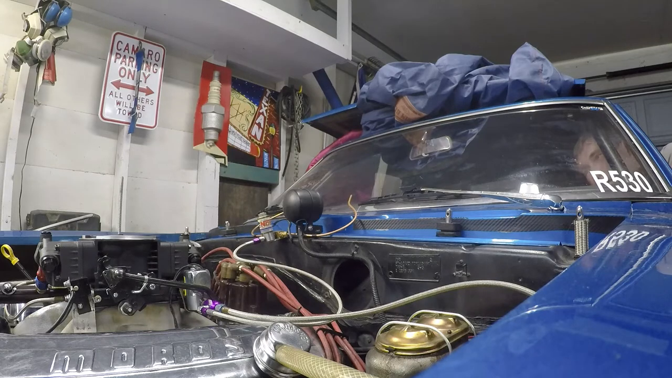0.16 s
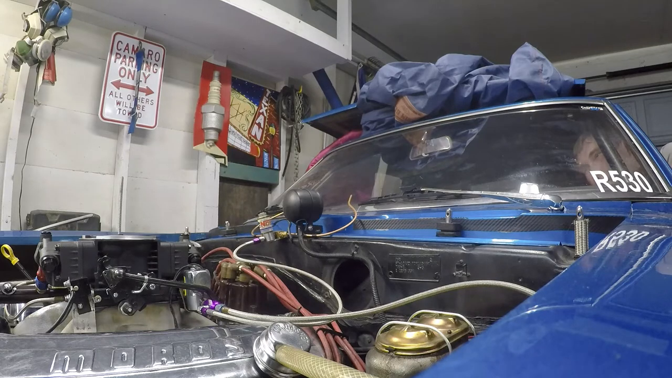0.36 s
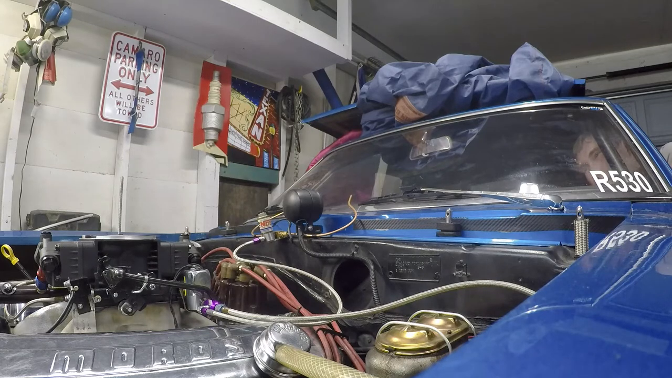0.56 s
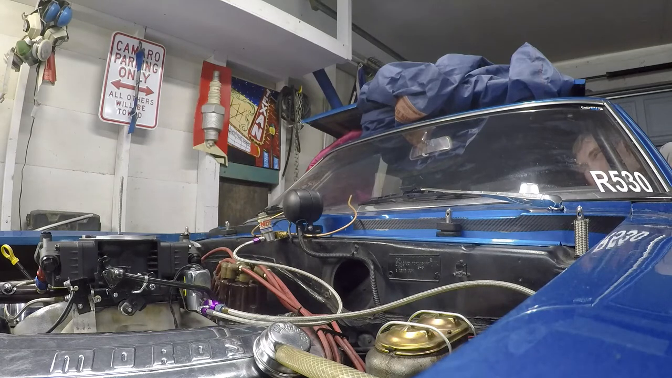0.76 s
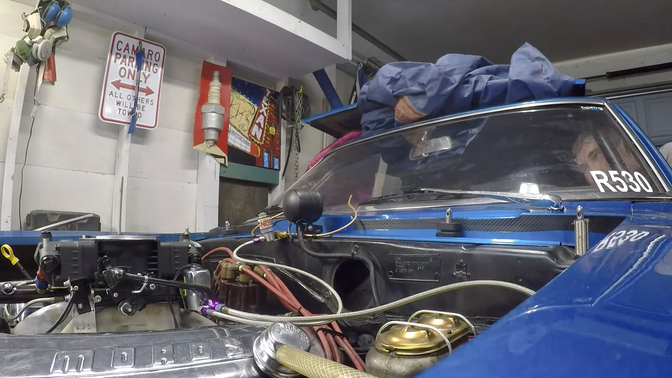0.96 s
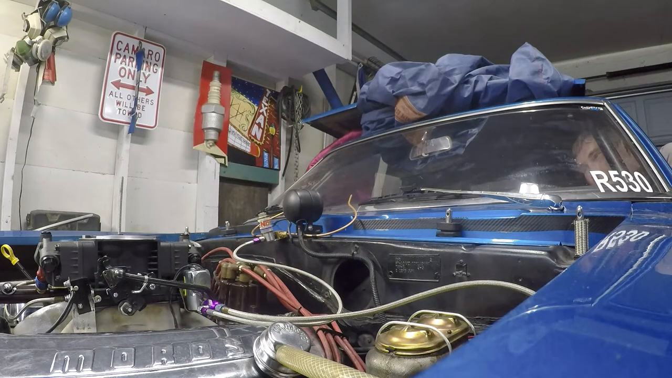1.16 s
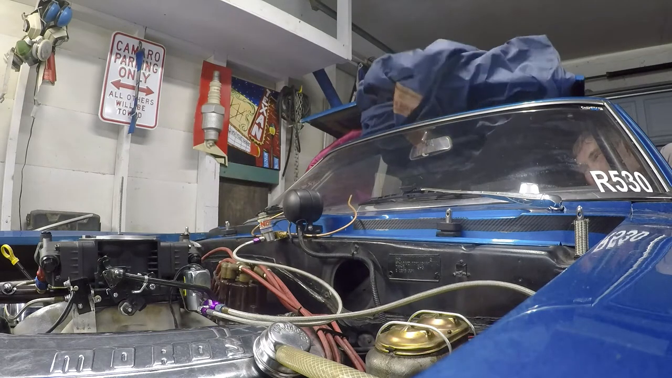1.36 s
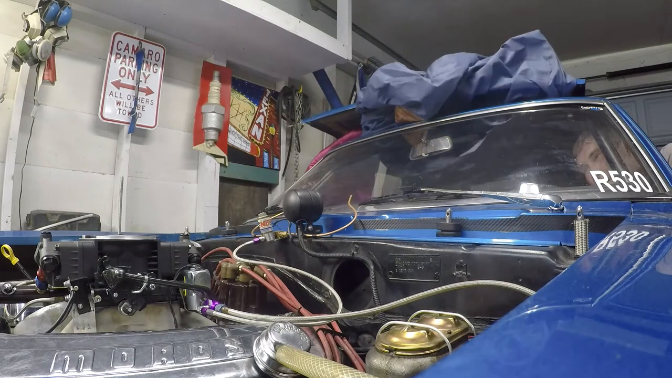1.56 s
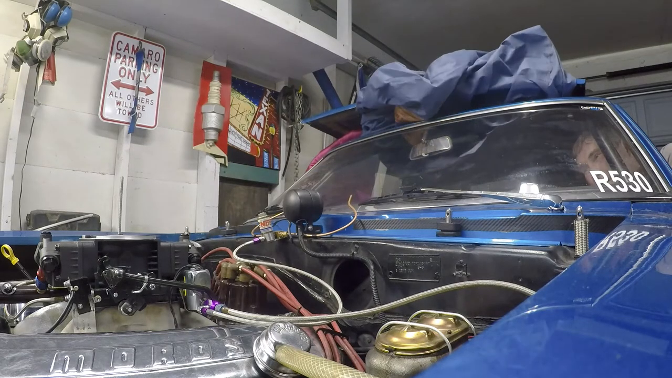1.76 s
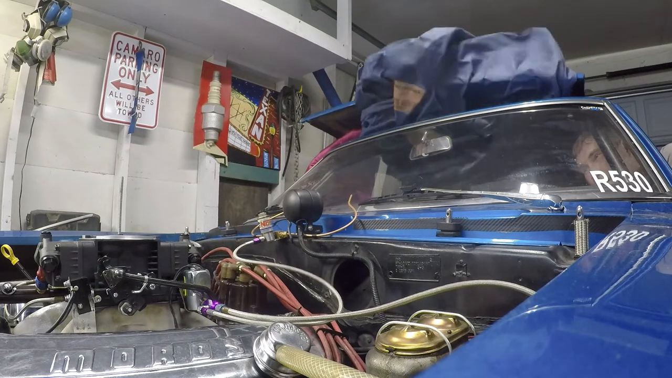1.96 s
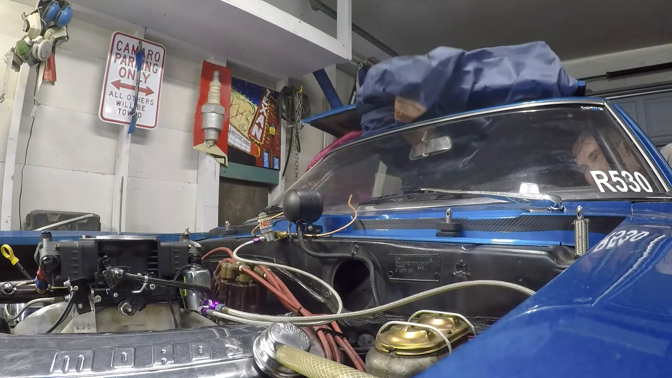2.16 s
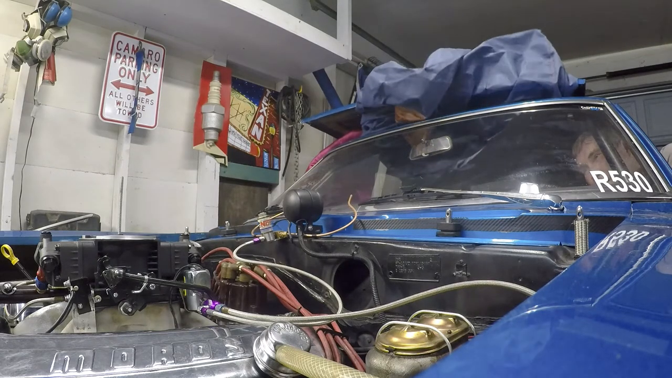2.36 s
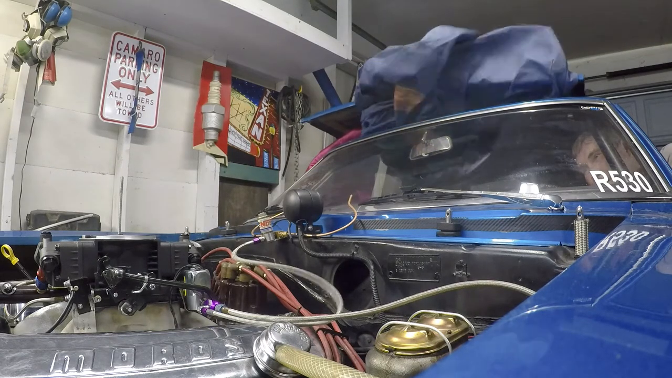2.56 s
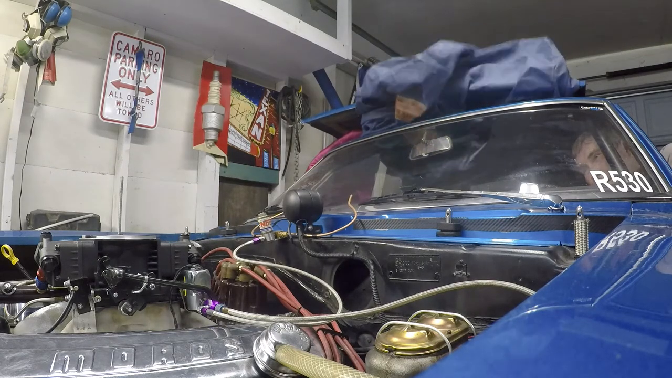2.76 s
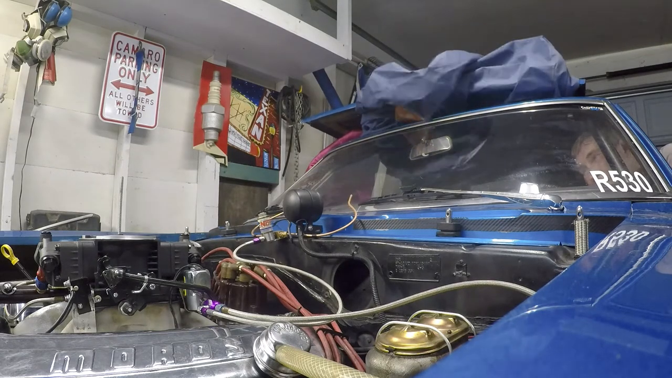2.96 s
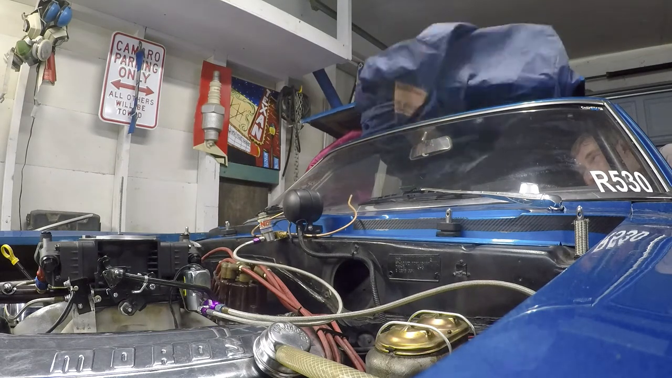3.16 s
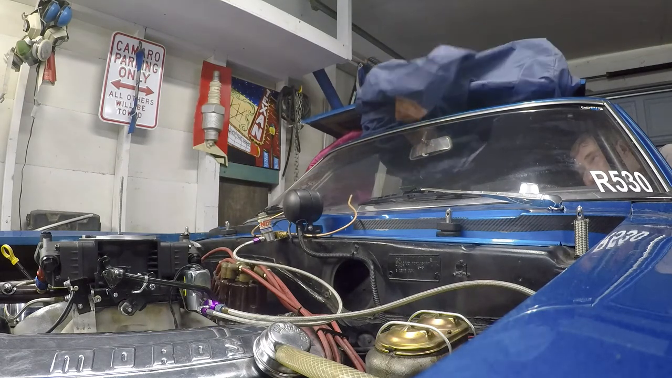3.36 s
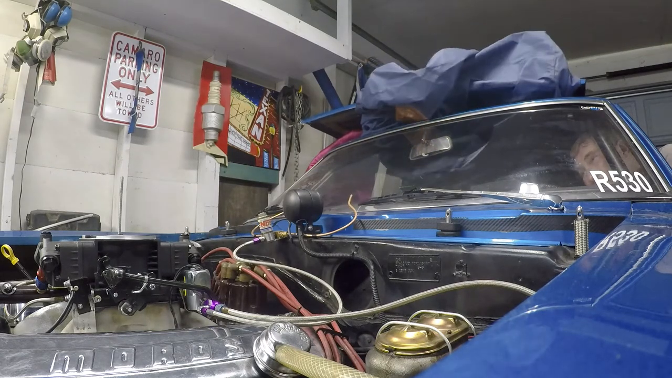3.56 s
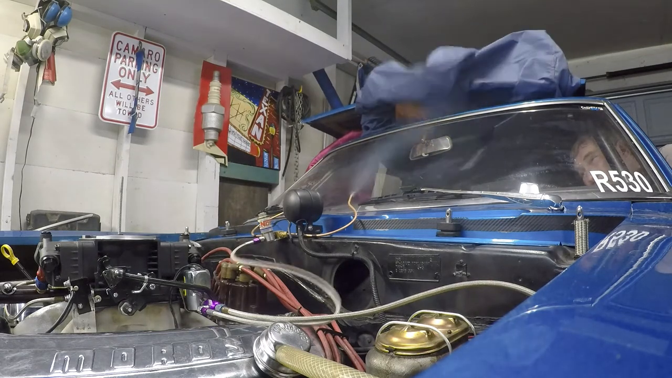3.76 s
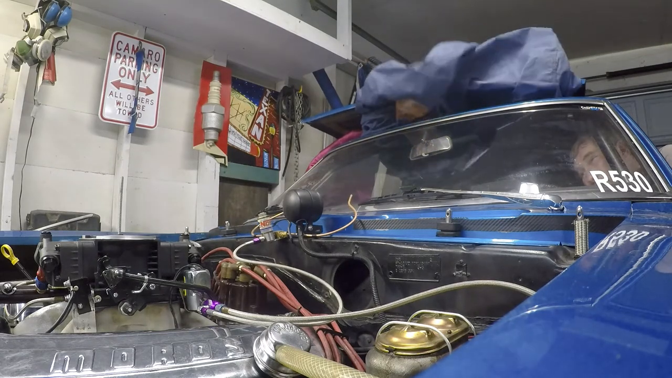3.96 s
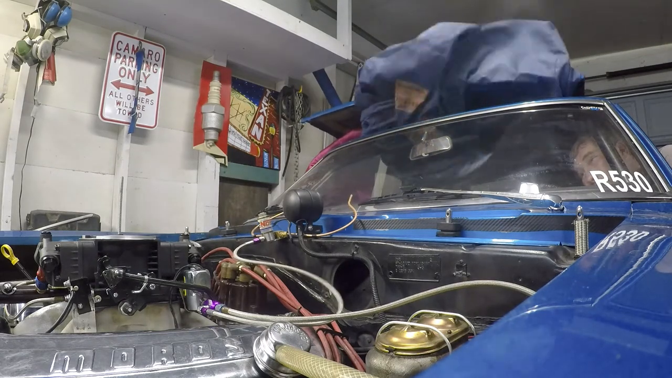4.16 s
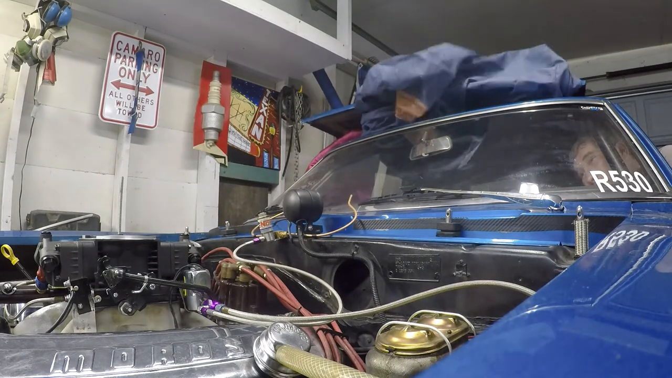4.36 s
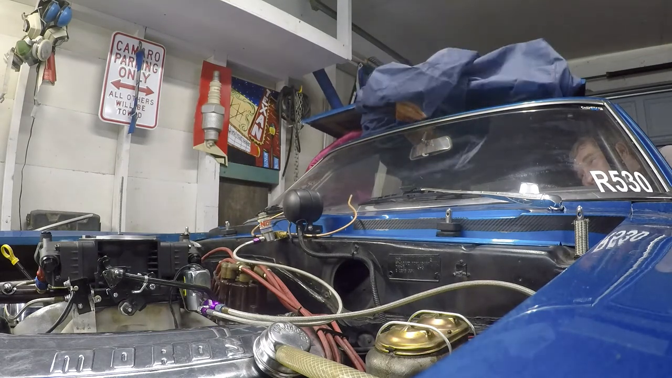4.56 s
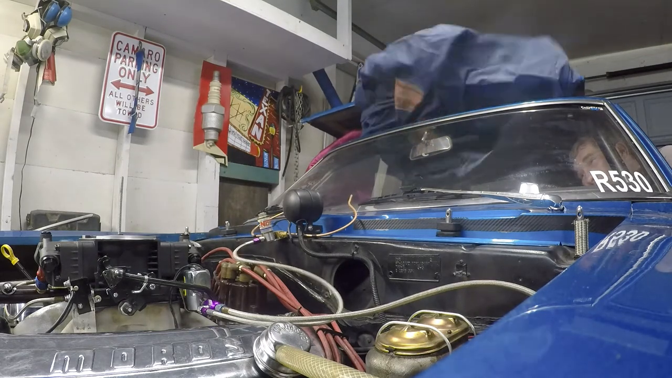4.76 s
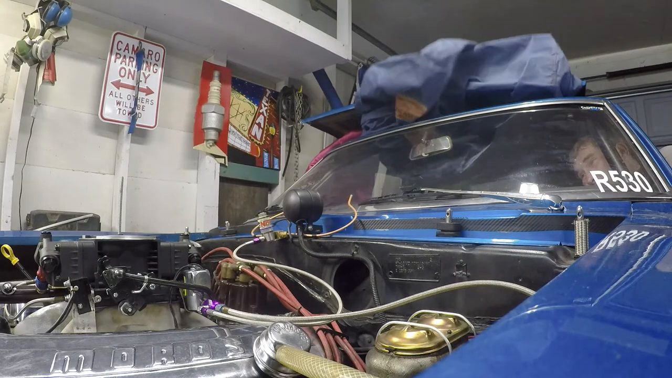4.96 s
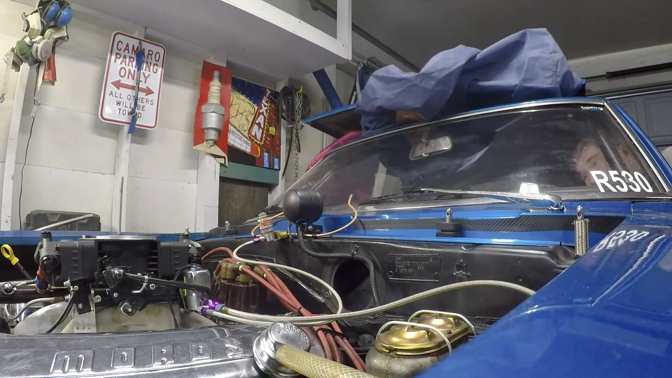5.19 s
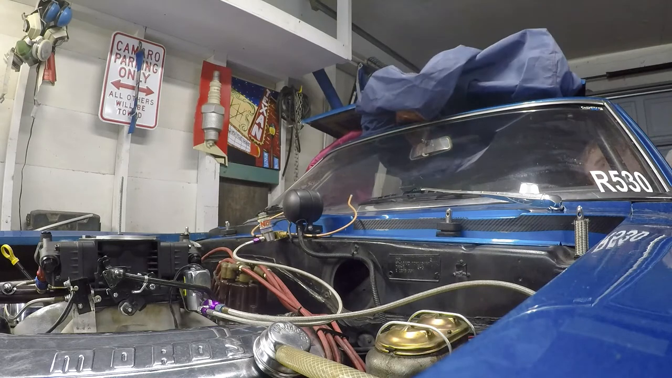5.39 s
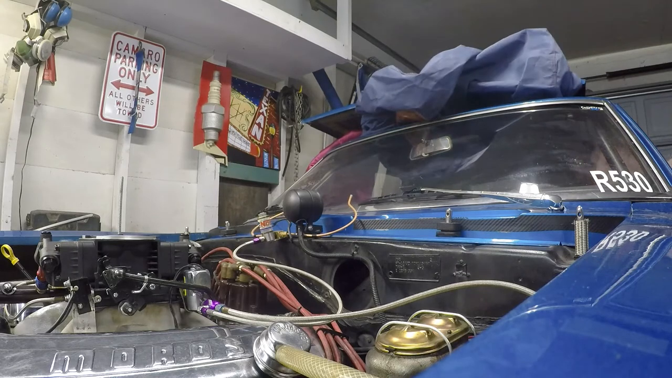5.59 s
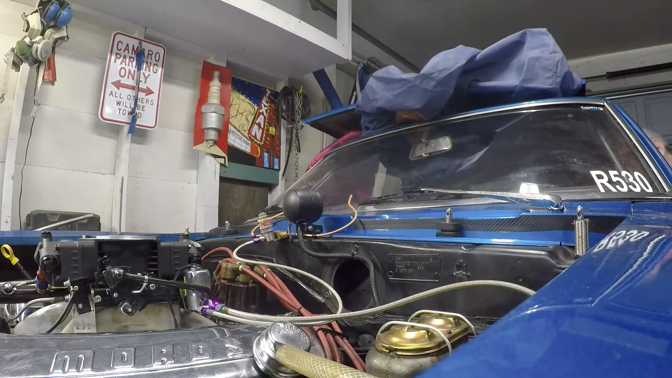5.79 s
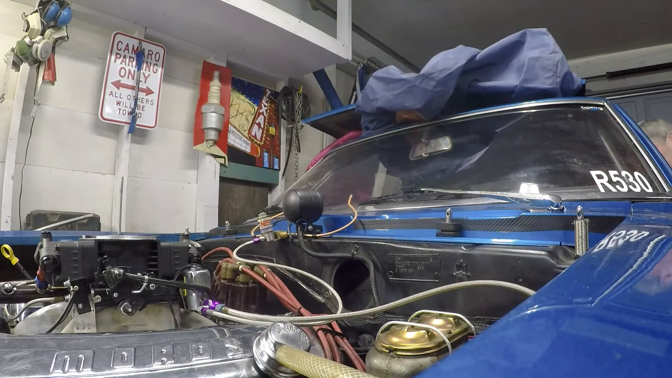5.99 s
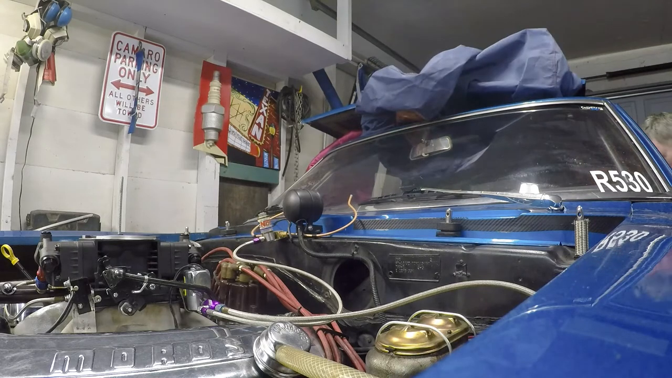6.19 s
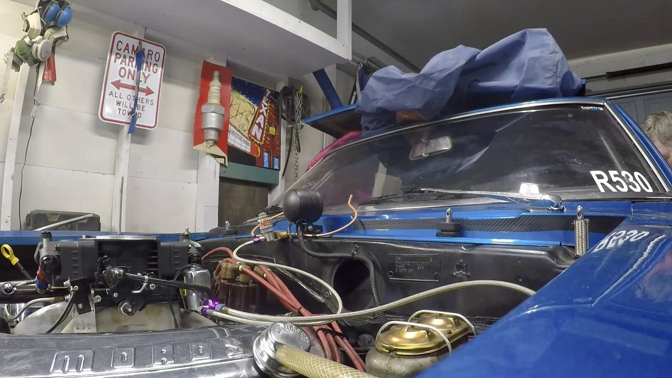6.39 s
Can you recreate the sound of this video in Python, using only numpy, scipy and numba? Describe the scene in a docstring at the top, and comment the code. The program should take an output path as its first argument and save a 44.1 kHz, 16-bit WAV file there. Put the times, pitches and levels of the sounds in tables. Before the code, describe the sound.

Sharp bursts of hissing gas, spaced about half a second apart, thump and echo through a small garage after a quiet start.

```python
"""A solenoid valve vents pressurised gas in seven short blasts inside a closed garage, near a small camera's microphone.
Each blast is shaped noise on the valve's flow: jet hiss, hose roar, nozzle whistle and an opening clack.
Opening and shutting thump low modes of the room and bodywork; the walls ring on and a dull echo returns from far off.
A quiet floor, soft rustle nearby, a dying clank and dry ticks lie behind; gain control ducks them after each blast."""
import sys
import numpy as np
from scipy import signal
from scipy.fft import rfft, irfft
from scipy.io import wavfile
from scipy.ndimage import uniform_filter1d
from numba import njit

SR = 44100
rng = np.random.default_rng(int(sys.argv[2]) if len(sys.argv) > 2 else 0)


def ratio_of_db(decibels):
    """Turn decibels (scalar or array-like) into linear amplitude factors; 0 dB maps to 1."""
    return 10 ** (np.asarray(decibels, float) / 20)


def store_pcm(level_fs):
    """Save levels as 16-bit WAV."""
    pcm = np.round(np.clip(level_fs, -1, 1) * 32767).astype(np.int16)
    wavfile.write(sys.argv[1], SR, np.atleast_2d(pcm).T)


N = 283563
T = np.arange(N) / SR  # s

# the valve's blasts: (opens [s], stays open [s], stored pressure [dB],
# liquid reaches the nozzle after [s], hose roar [dB])
BLASTS = [(1.257, 0.074, 3.5, 0.042, -35), (1.865, 0.1, 2, 0.11, -14), (2.497, 0.08, -0.5, .06, -16),
          (3.054, 0.074, -1, 0.023, -18), (3.781, 0.031, 4, 0.013, -18), (4.077, 0.084, 0, .02, -20),
          (4.697, 0.087, 0.5, 0.022, -17.5)]


def unit(x):
    """Scale to rms 1."""
    return x / np.sqrt(np.mean(x ** 2))


def coloured(points, count=N):
    """Noise of rms 1 with a spectrum given as (frequency [Hz], density [dB]) points."""
    hz, db = np.transpose(points)
    f = np.maximum(np.fft.rfftfreq(count, 1 / SR), 1)
    gain = ratio_of_db(np.interp(np.log(f), np.log(hz), db))
    return unit(irfft(rfft(rng.standard_normal(count)) * gain, count))


def resonant(peaks, count=N):
    """Noise of rms 1 ringing in (centre [Hz], width [Hz], level [dB]) resonances."""
    noise = rng.standard_normal(count)
    total = 0
    for hz, width, db in peaks:
        total = total + ratio_of_db(db) * unit(signal.lfilter(*signal.iirpeak(hz, hz / width, fs=SR), noise))
    return unit(total)


def walk(rate):
    """Random levels held 1 / rate seconds and slewed twice; spread near 1."""
    k = int(SR / rate)
    steps = np.repeat(rng.standard_normal(N // k + 1), k)
    return 1.1 * uniform_filter1d(uniform_filter1d(steps, k), k)[:N]


def quiet_floor():
    """Steady low-heavy noise wandering slightly in level, the same in both channels."""
    # spectrum: (frequency [Hz], density [dB])
    floor_points = [(12, -32), (20, -2.5), (43, -1), (60, -12), (134, -14), (158, -29.5), (204, -25.5),
                    (377, -32.5), (698, -36), (4000, -43.5), (14300, -54), (16000, -62)]
    return ratio_of_db(-48.5 + 0.72 * walk(9.8)) * coloured(floor_points)


def channel_difference():
    """Faint part of the floor, with opposite sign in the two channels."""
    # spectrum: (frequency [Hz], density [dB])
    width_points = [(35, -28), (60, -4), (160, -11), (196, -5), (427, -18.5), (523, -8.5), (5000, -27),
                    (6500, -49.5), (11000, -120)]
    return ratio_of_db(-77.5) * coloured(width_points) * np.array([[1], [-1]])


def rustle():
    """Something stirs softly nearby: band noise that swells and fades exponentially, fluttering in level."""
    # (loudest at [s], level [dB], swell [s], fade [s], centre [Hz])
    stirs = [(0.49, -64, 0.035, .06, 2500), (1.11, -68.5, .02, .05, 1998), (5.48, -72, 0.092, 0.029, 600),
             (5.655, -63.5, .04, 0.045, 2380), (6.2, -64.5, 0.098, .08, 1090), (6.43, -60, 0.14, .1, 805)]
    total = np.zeros(N)
    for peak_s, db, swell, fade, hz in stirs:
        envelope = np.exp(-np.maximum((peak_s - T) / swell, (T - peak_s) / fade))
        total += ratio_of_db(db) * envelope * resonant([(hz, 1.3 * hz, 0)])
    return ratio_of_db(2.0 * walk(43)) * total


def fading_clank():
    """The last of an earlier clank: resonant noise dying away from the start."""
    # (centre [Hz], width [Hz], level [dB])
    clank_peaks = [(460, 54, 5), (905, 160, 7), (1860, 100, 2), (2220, 300, 2), (2750, 250, -1),
                   (3080, 260, -15)]
    level_db, t60_s = -53.5, 0.5
    return ratio_of_db(level_db - 60 * T / t60_s) * resonant(clank_peaks)


def dry_ticks():
    """Faint ticks: noise starting at once and dying within hundredths of a second."""
    # (time [s], starting level [dB])
    tick_list = [(1.0974, -55), (3.678, -56), (4.6458, -52), (6.2587, -55)]
    t60_s = 0.02
    envelope = sum((T >= s) * ratio_of_db(db - 60 * np.maximum(T - s, 0) / t60_s) for s, db in tick_list)
    return envelope * coloured([(500, -19.5), (2500, 3), (5000, -8.0), (10000, -24.5)])


def room(x):
    """Dense wall reflections, each third octave dying at its own rate, and a late dull echo."""
    # wall decay: (frequency [Hz], t60 [s])
    decay_points = [(100, 0.31), (300, 0.53), (800, 0.5), (2000, 0.42), (5000, 0.41), (10000, 0.36),
                    (16000, .3)]
    # spectrum of the far echo: (frequency [Hz], density [dB])
    echo_points = [(100, -4), (300, 4), (700, -3), (1300, -7), (2200, -16), (4000, -21.5), (8000, -33)]
    room_db, room_onset_s = -1.5, 0.0053
    echo_s, echo_db, echo_onset_s, echo_t60_s = 0.25, -28, 0.014, 0.43
    t = T[:SR]
    hz, t60 = np.transpose(decay_points)
    spectrum = rfft(rng.standard_normal(SR))
    octave = np.log2(np.arange(SR // 2 + 1) + 1)
    tail = np.zeros(SR)
    for centre in np.arange(16, 44) / 3:  # overlapping triangular bands, centres in log2 Hz
        band = irfft(spectrum * np.maximum(1 - 3 * abs(octave - centre), 0), SR)
        tail += band * ratio_of_db(-60 * t / np.interp(centre, np.log2(hz), t60))
    tail = ratio_of_db(room_db) * tail * np.minimum(t / room_onset_s, 1) / np.sqrt(0.034 * SR)
    late = np.maximum(t - echo_s, 0)
    envelope = (1 - np.exp(-late / echo_onset_s)) * ratio_of_db(echo_db - 60 * late / echo_t60_s)
    echo = coloured(echo_points, count=SR) * envelope / np.sqrt(0.057 * SR)
    return x + signal.fftconvolve(x, tail + echo)[:N]


def thump():
    """The gas volume starting pushes the low modes; stopping pulls the higher ones back."""
    # low modes of room and bodywork: (frequency [Hz], polarity and size [factor], level [dB], t60 [s])
    modes = [(26, 1, -6.5, 0.3), (65.03, 0.99, -17, 1.5), (84.8, -0.73, -1.5, 0.53), (99.05, 1, -14, .7),
             (30.33, 1, -8, 1.5), (121.8, -1.2, -5.5, 0.35), (141.8, 0.92, -16, 0.85),
             (162.7, -1.4, -16.5, 0.8), (148, -0.56, 4, 0.17), (213, 0.73, 0, 0.13), (256, -1.6, -7, 0.028),
             (328.6, -1.3, -12, 0.18)]
    lag_s = 0.0037  # from valve to thump
    open_db, shut_db = -17, -15.5
    full_flow_s = 0.031  # a short blast stops before the flow is full
    shut_corner_hz = 68.4  # shutting is a shorter push: it barely moves the modes below this
    return_s, return_db = 0.099, -3  # the deepest modes get a second push as the pressure step comes back
    opening, shutting = np.zeros((2, N))
    for opens, held, pressure_db, *_ in BLASTS:
        opening[int((opens + lag_s) * SR)] = ratio_of_db(open_db + pressure_db)
        fullness = 1 - np.exp(-(held / full_flow_s) ** 3.0)
        shutting[int((opens + held + lag_s) * SR)] = ratio_of_db(shut_db) * fullness
    t = T[:2 * SR]
    rings = np.array([sign * ratio_of_db(db - 60 * t / t60) * np.sin(2 * np.pi * hz * t)
                      for hz, sign, db, t60 in modes])
    moved = 1 / (1 + (shut_corner_hz / np.array(modes)[:, 0]) ** 2)
    returning = ratio_of_db(return_db) * np.roll(opening, int(return_s * SR))
    push = signal.fftconvolve(opening, rings.sum(axis=0))
    second_push = signal.fftconvolve(returning, (1 - moved) ** 2 @ rings)
    pull = signal.fftconvolve(shutting, moved @ rings)
    return (push + second_push - pull)[:N]


def jet():
    """One patch of the plume: turbulent hiss, hose roar, nozzle whistle and opening clack on the valve's flow."""
    # turbulent hiss: (frequency [Hz], density [dB])
    jet_points = [(88, -32.5), (150, -0.5), (383, -10), (457, -11.5), (837, -12.5), (979, -9.5), (2180, -8),
                  (3220, -3.5), (11000, -7.5), (15100, -9.5), (16000, -26)]
    # hose resonances: (centre [Hz], width [Hz], level [dB])
    hose_peaks = [(656.5, 150, -3.5), (904.5, 220, -7), (1220, 430, -10.5)]
    # nozzle whistle: (centre [Hz], width [Hz], level [dB])
    nozzle_peaks = [(5640, 500, -1), (9200, 400, -3), (10450, 490, -1)]
    rise_s, surge_db, surge_s, bleed_s = 0.005, 3, 0.032, 0.022
    hiss_db, hiss_db_per_db = -13, 0.38  # hiss level and how closely it follows the stored pressure
    clack_db, clack_t60_s = -24.5, 0.03
    roar_rise_db_s, roar_fall_db_s = 220, 131  # roar swells until the liquid arrives, then sags
    whistle_db, whistle_fade_db_s = -18.5, 6.5  # dry gas whistles at first, less as the line fills
    out, t = np.zeros(N), T[:SR // 3]
    for opens, held, pressure_db, arrives, roar_db in BLASTS:
        # flow jumps up with a surge of stored pressure; after shutting the hose bleeds empty
        surge = ratio_of_db(surge_db * np.exp(-t / surge_s))
        bleed = np.exp(-np.maximum(t - held, 0) / bleed_s)
        flow = (1 - np.exp(-t / rise_s)) * surge * bleed
        hiss_level = flow * ratio_of_db(hiss_db + hiss_db_per_db * pressure_db)
        clack_level = ratio_of_db(clack_db - 60 * t / clack_t60_s)
        hiss_and_clack = (hiss_level + clack_level) * coloured(jet_points, count=len(t))
        sag_db = np.maximum(roar_rise_db_s * (arrives - t), roar_fall_db_s * (t - arrives))
        roar = ratio_of_db(roar_db - sag_db) * resonant(hose_peaks, count=len(t))
        fade_db = whistle_fade_db_s * (opens - BLASTS[0][0])
        whistle = ratio_of_db(whistle_db - fade_db) * resonant(nozzle_peaks, count=len(t))
        out[int(opens * SR):][:len(t)] += hiss_and_clack + flow * (roar + whistle)
    return ratio_of_db(1.5 * walk(150)) * out  # the whole patch flutters in level


def plume(count=4):
    """The plume is long: unrelated patches of it each reach the microphone by their own reflections."""
    return sum(room(jet()) for _ in range(count)) / np.sqrt(count)


def scene():
    """Background, thumps and plume summed at the microphone, in two channels."""
    background = quiet_floor() + channel_difference() + rustle() + fading_clank() + dry_ticks()
    return background + thump() + plume()


@njit
def follow(x, attack, release):
    """Peak follower with fast rise and slow fall."""
    e, out = 0., np.empty(len(x))
    for i in range(len(x)):
        e += (abs(x[i]) - e) * (attack if abs(x[i]) > e else release)
        out[i] = e
    return out


def top_cut(x):
    """Nothing passes above the cut-off."""
    return signal.sosfilt(signal.butter(12, 16630, fs=SR, output="sos"), x)


def record(dry):
    """The camera's gain control turns down after loud sound and recovers slowly; the top is cut."""
    knee_db, slope = -40, 0.13  # slope: dB of reduction per dB above the knee
    attack_s, release_s = 0.0073, 0.081
    top_hz = 15400
    envelope = follow(dry.mean(axis=0), 1 / (attack_s * SR), 1 / (release_s * SR))
    levelled = dry * np.maximum(envelope / ratio_of_db(knee_db), 1) ** -slope
    low_pass = signal.ellip(10, 0.2, 45, top_hz, fs=SR, output="sos")
    finished = signal.sosfilt(low_pass, levelled)
    return top_cut(finished)


dry = scene()
out = record(dry)
store_pcm(out)
```